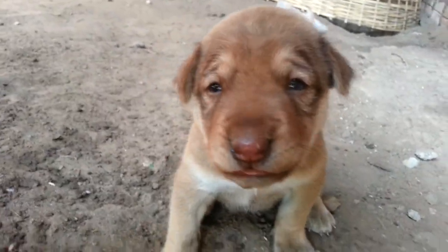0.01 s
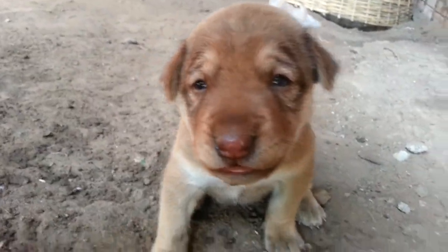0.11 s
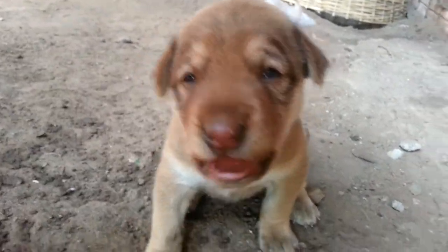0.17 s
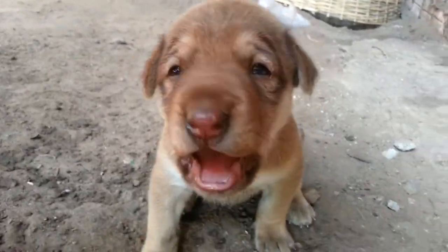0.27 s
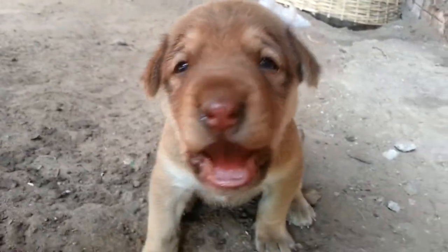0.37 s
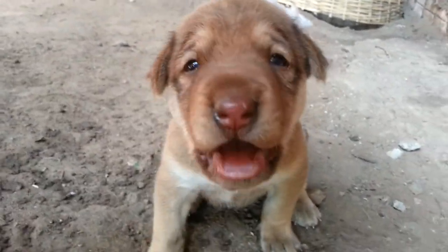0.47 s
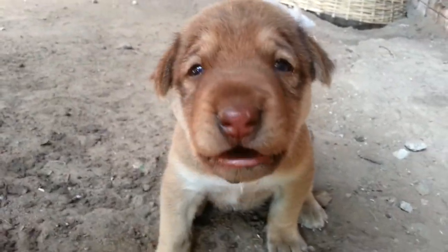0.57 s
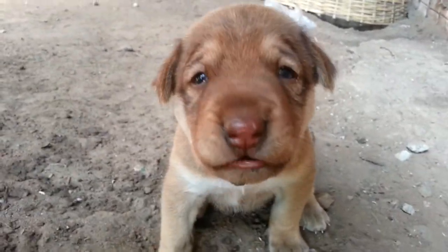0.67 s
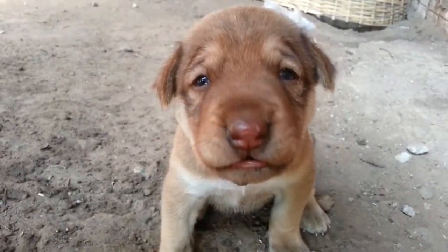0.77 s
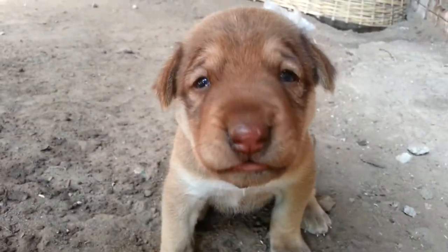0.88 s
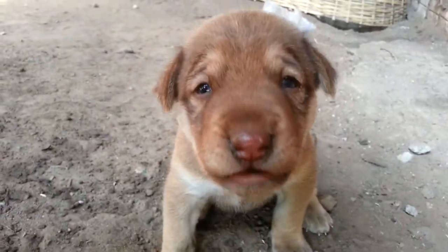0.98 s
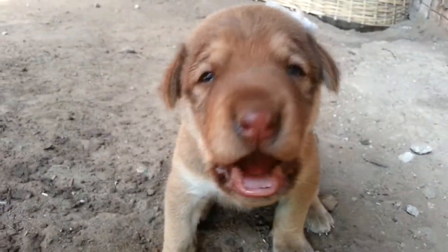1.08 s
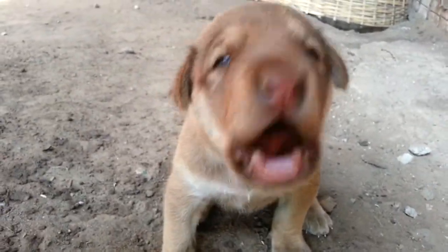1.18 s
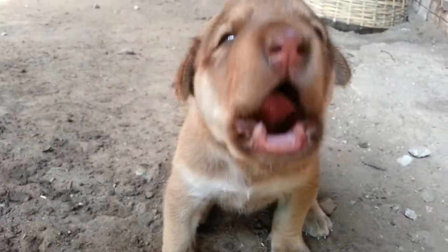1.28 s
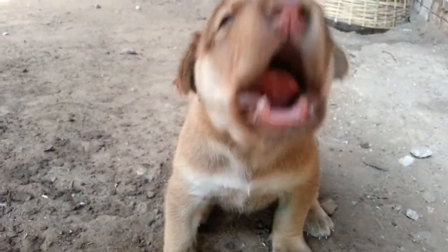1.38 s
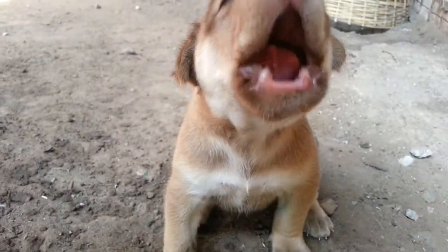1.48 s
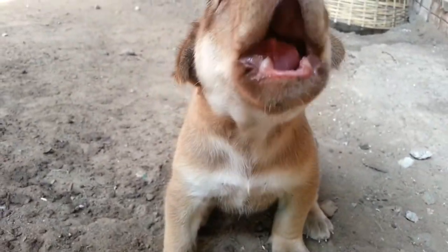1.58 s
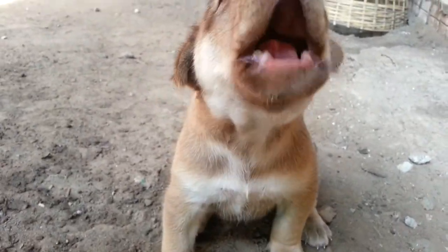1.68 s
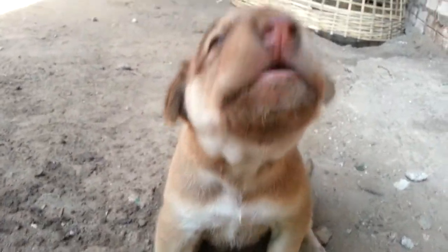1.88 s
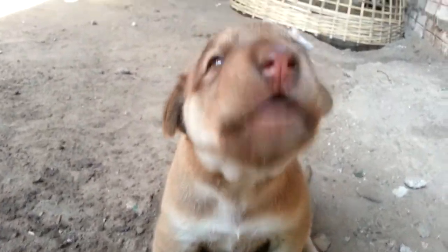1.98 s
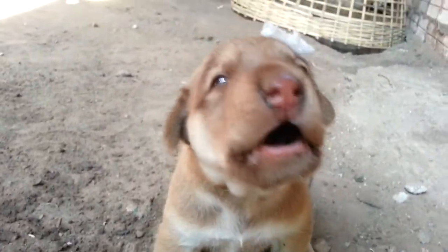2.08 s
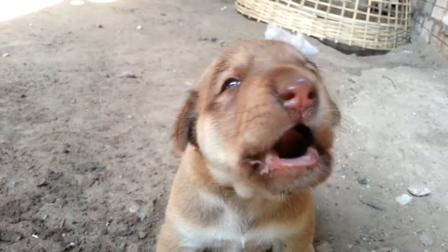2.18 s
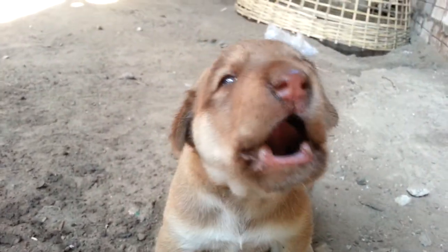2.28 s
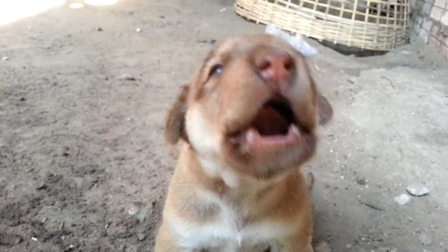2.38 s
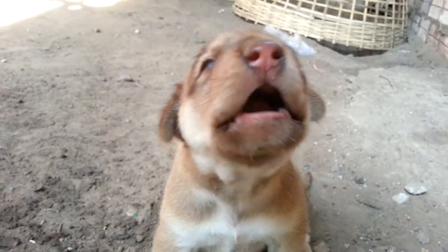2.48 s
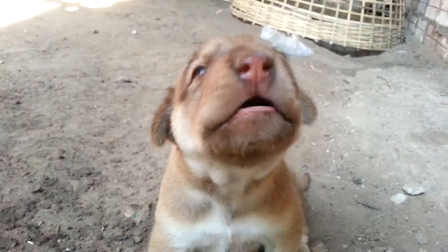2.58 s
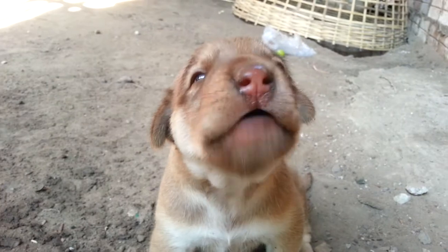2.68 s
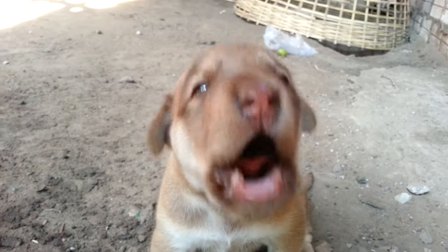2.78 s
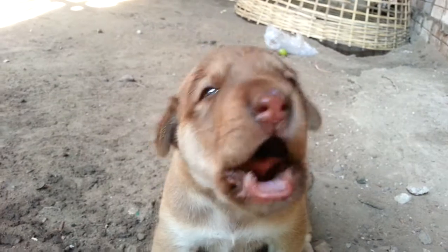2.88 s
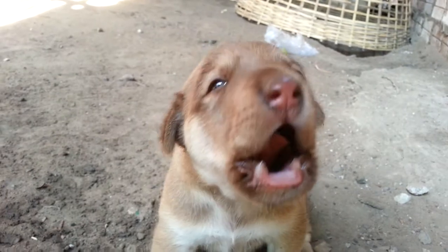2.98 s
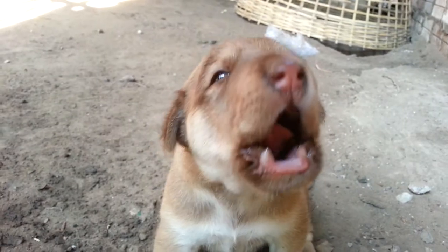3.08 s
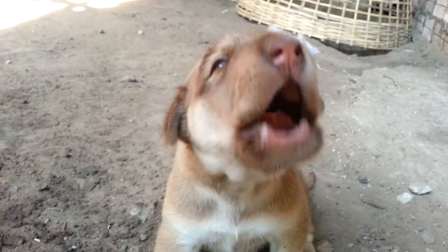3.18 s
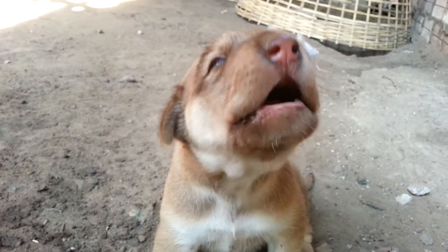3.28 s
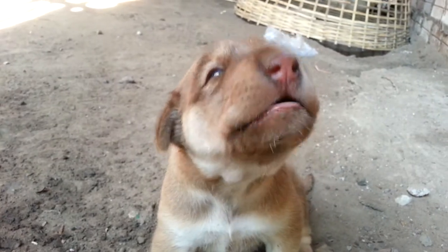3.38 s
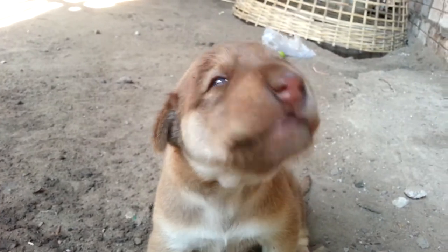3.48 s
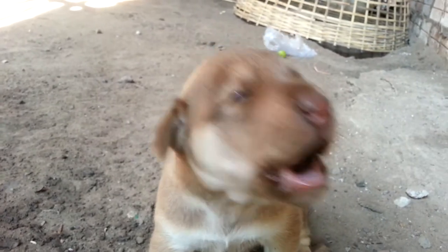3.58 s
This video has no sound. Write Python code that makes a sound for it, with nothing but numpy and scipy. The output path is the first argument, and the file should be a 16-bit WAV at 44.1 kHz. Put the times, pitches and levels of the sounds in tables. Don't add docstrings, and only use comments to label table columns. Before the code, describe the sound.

A puppy close to a handheld stereo microphone finishes one cry, then gives a sharp yelp turning creaky, a high whistling whine, a lower moan and an arching cry, in a walled dirt yard.

```python
import sys
import numpy as np
from scipy import signal
from scipy.fft import rfft, irfft
from scipy.io import wavfile
from scipy.ndimage import uniform_filter1d

SR = 44100
rng = np.random.default_rng(int(sys.argv[2]) if len(sys.argv) > 2 else 0)


def bounce(signal):
    frames = np.transpose(np.atleast_2d(signal))
    limited = np.clip(frames, -1, 1)
    pcm = np.round(limited * 32767).astype(np.int16)
    wavfile.write(sys.argv[1], SR, pcm)


def voltage_ratio(level):
    return 10 ** (np.asarray(level, float) / 20)


N = 158760
OVERDRIVE_FROM_DB = -7


def evened(x):
    return x / np.sqrt(np.mean(x ** 2) + 1e-20)


def read(points, hz):
    f, value = np.transpose(points)
    return np.interp(np.log(hz + 1), np.log(f + 1), value)


def resonate(x, hz, width):
    turn = np.exp(2j * np.pi * np.cumsum(hz * np.ones(len(x))) / SR)
    r = np.exp(-np.pi * width / SR)
    return 2 * (turn * signal.lfilter([1 - r], [1, -r], x / turn + 1e-18)).real


def vocal_folds(t, hz, db, rough, noise, wander):
    creak = np.clip((rough - 0.72) / 0.017, 0, 1) * (db < OVERDRIVE_FROM_DB)
    jitter = 0.27 * (rough - 0.36 * creak) ** 2 * evened(uniform_filter1d(noise[0], size=60))
    turns = np.cumsum(hz * (1 + jitter)) / SR
    k = np.arange(1, 34)[:, None]
    drift_hz = rng.uniform(4.013, 14, (3, len(k), 1))
    drift = np.sin(2 * np.pi * (drift_hz * t + rng.random((3, len(k), 1)))).sum(0)
    patchy = voltage_ratio(0.91 * np.sqrt(k - 1) * drift)
    folds = ((k * hz < 16000) * patchy * np.cos(2 * np.pi * k * turns)).sum(0)

    uneven = np.cos(np.pi * turns) + rough * evened(uniform_filter1d(noise[1], size=90))
    puffs = (0.83 + np.exp(-(turns % 1) / 0.45)) * noise[2]
    breathiness = voltage_ratio(-33.5) + 6.9 * rough ** 2 * (1 - rough)
    drive = folds * (1 + 0.5 * rough * uneven) + breathiness * puffs

    third = np.cos(2 * np.pi * turns / 3) - 1
    knocks = creak * (folds + 1.3 * puffs) * np.exp(2.2 * third) * voltage_ratio(1.8 * wander[2])
    return drive * (1 - creak), knocks, puffs


def vocal_tract(drive, knocks, puffs, age, mouth, throat_scale, nasal_db, colour_db, shut):
    # (frequency [Hz], width [Hz], left port level [dB], right port level [dB])
    formants = [(930, 790, -13, -13.5), (1599, 351, 2.5, 10.5), (2106, 526, -9.5, -1.5),
                (3135, 540, -14.5, -9.5), (4299, 480, -15, -16), (7420, 2180, -23.5, -28),
                (12000, 1670, -36, -45)]
    # (frequency [Hz], width [Hz], level [dB])
    slack_formants = [(985, 390, -1.5), (1660, 310, -0.5), (2370, 344, -3), (4300, 990, -20.5)]
    scale = throat_scale * (1 - shut * np.exp(-age / 0.025))
    opened = 45 * (mouth - 1)
    muffled = -12 * np.exp(-(age / 0.052) ** 2)
    lift = [0, 0, 0.6 * opened + muffled, opened, opened, opened, nasal_db]
    tongue = [0, *colour_db, 0]
    bands = []
    for i, (f, w, _, _) in enumerate(formants):
        centre = f * scale ** (i < 5)
        source = drive + (i == 6) * voltage_ratio(0.5) * puffs
        ringing = resonate(resonate(source, centre, w), centre, 1.165 * w)
        bands.append((-1) ** i * voltage_ratio(lift[i] + tongue[i]) * ringing)
    voice = -voltage_ratio(np.array(formants)[:, 2:].T) @ bands

    slack = 0
    for i, (f, w, db) in enumerate(slack_formants):
        slack = slack + (-1) ** i * voltage_ratio(db) * resonate(resonate(knocks, f, w), f, w)
    voice = voice + voltage_ratio([[5.5], [7]]) * slack
    voice = signal.sosfilt(signal.butter(4, 300, 'high', fs=SR, output='sos'), voice)
    return signal.lfilter(*signal.iirnotch(8750, 2.5, SR), voice)


def breath(rows, rate, share, crest, catch_db, throat_scale, nasal_db, colour_db, shut):
    s, hz, db, rough, mouth = np.transpose(rows)
    start = round(s[0] * SR)
    t = np.arange(start, min(N, round((s[-1] + 0.24) * SR))) / SR
    age = t - s[0]
    hz, db, rough, mouth = (np.interp(t, s, v) for v in (hz, db, np.clip(rough, 0, 1), mouth))
    noise = rng.standard_normal((N // 4, 4))[:len(t)].T
    wander = [evened(uniform_filter1d(uniform_filter1d(v, size=500), size=500)) for v in noise]

    beat = 2 * np.pi * rate * (t - crest)
    settled = np.clip(age / 0.094, 0, 1) ** 2
    shake = share * settled * (np.cos(beat) + 0.09 * np.sin(2 * beat))
    hz = uniform_filter1d(hz, size=250) * (1 + shake + 0.005 * wander[0])
    drive, knocks, puffs = vocal_folds(t, hz, db, rough, noise, wander)
    voice = vocal_tract(drive, knocks, puffs, age, mouth, throat_scale, nasal_db, colour_db, shut)
    voice = voice / np.sqrt(uniform_filter1d(voice.mean(0) ** 2, size=1800) + 1e-9)

    catch = catch_db * np.exp(-((t - s[-1] + 0.016) / 0.0078) ** 2)
    forced = np.maximum(db - OVERDRIVE_FROM_DB, 0)
    release = -26.0 * np.maximum(t - s[-1], 0) / 0.0072
    push = voltage_ratio(db + 0.3 * forced + release + catch + 0.74 * wander[1])
    push = push * np.minimum(age / 0.00082 + (s[0] == 0), 1)
    thump = evened(resonate(noise[3], 21, 50))
    blast = voltage_ratio([[-39.5], [-34.5]]) * rough * forced * thump
    return start, push * (voice + blast)


def puppy():
    # (time [s], pitch [Hz], effort [dB], roughness [0-1], mouth opening [ratio])
    tail_end = [(0, 474.4, -4.5, 0.12, 0.83), (.016, 434, -14, 0.31, 0.96), (.03, 420, -33.5, 0.2, 1)]
    yelp_rise = [(0.227, 443.3, -9.5, 0.19, 0.78), (0.243, 601, -2.5, 0.4, 1.17),
                 (0.27, 791.2, 4, 0.27, 1.13), (0.278, 1098, -3, 0.6, 1.576),
                 (.297, 1188, -1.5, 0.45, 1.36), (0.311, 1252, -2.5, 0.34, 1.35),
                 (0.321, 1204, -7.5, 0.14, 1.44), (0.331, 1076, -7.5, 0.05, 1.34)]
    sob = [(0.355, 1092, -8.5, .04, 1.11), (.371, 874.5, -12, 0.02, 1.105), (0.393, 986, -11.5, .02, 1.12),
           (0.409, 815.5, -13.5, .02, 1.14), (0.44, 896, -11.5, 0.032, 0.99), (.459, 789.4, -12, .03, 1.12),
           (0.481, 833, -14.5, 0.05, 1.08)]
    creaking = [(0.485, 849, -12, 0.72, 1.15), (0.513, 777, -8, 0.73, 1.01), (0.515, 743, -17, .3, 0.78),
                (0.526, 769, -23, 0.22, 1.05), (0.529, 812.6, -15.5, 0.72, 0.96),
                (0.581, 572, -22, 0.85, 0.9), (0.591, 800, -10.5, .8, 1.1), (0.596, 620, -12.5, 0.11, 0.63),
                (0.609, 686, -20.5, 0.14, 0.87)]
    waver = [(1.081, 438.7, -8.5, 0.081, 1.06), (1.093, 564.2, -4, 0.08, 1.15),
             (1.11, 774.3, 1, 0.15, 1.18), (1.115, 1026, -5, 0.7, 1.44), (1.131, 1068, 1.5, 0.69, 1.27),
             (1.136, 1249, 0, 0.4, 1.18), (1.182, 1235, -7, 0.072, 1.21), (1.19, 1054, -7, 0.029, 1.18)]
    waver_steps = [(1.217, 1071, -11, .04, 1.25), (1.231, 824, -7, 0.071, 0.92),
                   (1.241, 835, -10.5, 0.047, 0.92), (1.255, 944, -10.5, .04, 0.74),
                   (1.267, 793, -10, 0.026, 0.91), (1.277, 823, -8, .03, 0.76),
                   (1.285, 978, -10.5, 0.051, 1.03), (1.309, 1002, -6.5, .04, 1.06),
                   (1.316, 1093, -15, 0.045, 0.93)]
    whistle = [(1.315, 1203, -14.5, 0.19, 1), (1.329, 1309, -6.5, 0.068, 1), (1.364, 1310, -5, .03, 0.88),
               (1.413, 1241, -11, .006, 0.97), (1.453, 1248, -9.5, 0.0058, 1),
               (1.528, 1139, -8.5, 0.004, 0.93), (1.745, 1163, -10.5, 0.021, 0.91)]
    whistle_end = [(1.791, 1132, -17, 0.03, 0.96), (1.809, 1130, -12.5, 0.13, 0.89),
                   (1.816, 1045, -12, 0.19, 0.83), (1.826, 993, -14.5, 0.19, 0.55)]
    howl = [(2.061, 372, -28.5, 0.27, 1), (2.089, 548, -5.5, 0.14, 1.02), (2.115, 599.7, -4, 0.04, 1.17),
            (2.148, 603, -10, 0.015, 1.114), (2.211, 474.4, -10, 0.009, 1.016),
            (2.248, 470, -10.5, 0.0063, 1.065), (2.272, 495.6, -8, .007, 0.91),
            (2.4, 541.2, -9, 0.0096, 0.88)]
    howl_end = [(2.429, 525.6, -8.5, .008, 0.85), (2.52, 521.4, -7, .01, 0.71),
                (2.551, 538, -10, 0.016, 0.85), (2.57, 496, -11, 0.3, 0.71)]
    cry_rise = [(2.777, 348.7, -15, 0.21, 0.9), (2.796, 580.3, -5, 0.096, 1.144),
                (2.817, 950, 0.5, 0.65, 1.2), (2.844, 1130, 0.5, 0.61, 1.22),
                (2.876, 992, -4.5, 0.043, 1.15), (2.899, 938, -5.5, 0.011, 1.1),
                (2.918, 745, -10.5, 0.024, 0.91)]
    cry_sag = [(2.951, 714.6, -10.5, .01, 0.95), (2.97, 642, -10, .02, 0.87),
               (2.996, 634.5, -15, .02, 0.81), (3.012, 585, -10.5, .03, 0.78), (3.058, 616, -8.5, .02, 0.8),
               (3.077, 666, -11, 0.015, 0.84), (3.115, 709, -6.5, 0.018, 0.51)]
    cry_arch = [(3.132, 767, -5, 0.008, 0.65), (3.196, 828.7, -6.5, 0.013, 0.79),
                (3.254, 794, -10.5, 0.017, 0.25), (3.289, 730.6, -6.5, 0.014, 0.74),
                (3.311, 707, -13, 0.087, 0.71), (3.334, 618, -13.5, 0.27, 0.68)]
    next_cry = [(3.585, 360.4, -39, 0.58, 0.99), (3.6, 480, -9.5, 0.42, 1.15)]
    # (tremble rate [1/s], tremble depth [share], time of a crest [s], closing catch [dB],
    # throat scale [ratio], nasal hiss [dB])
    trembles = [
        (23, 0.0073, 10.5, -5.5, 0.97, -1.5),
        (22.78, 0.0039, 2.5, -3.5, 1.023, -12),
        (24, 0.0012, -2.8, 0, 1.061, -2.5),
        (23.98, 0.0005, 4.5, -10.5, 0.999, 7),
        (22.8, 0.015, 1.5, -3, 0.927, -7.5),
        (23.22, 0.0017, 3.5, -1.5, 0.964, -9),
        (23.1, 0.0036, -22, 3.5, 0.82, 8),
    ]
    # (2nd resonance [dB], 3rd [dB], 4th [dB], 5th [dB], 6th [dB])
    colours = [(0, 0, 0, 0.0068, -7.5), (0, -2, 0.011, 0.011, -3.5), (0, 1, 0, 0.006, 0.5),
               (0, 2, 0.016, 0, 0), (0, -1, 0, 0, -1), (0, 4.5, 0.0053, 0.012, 2.5), (0, -13.5, 0, 0, -4)]
    jaws = [0.011, 0.095, 0.13, 0.061, 0.42, 0.53, 0.12]
    # (delay [s], level [dB])
    bounces = [
        (.0011, -14),
        (.0016, -14.5),
    ]
    # (frequency [Hz], left lead [rad])
    port_phase = [(0, -4), (1640, 0.5), (4480, 1.5), (7410, -1.46), (11500, 1.7), (15100, -4.7)]
    cries = [tail_end, yelp_rise + sob + creaking, waver + waver_steps, whistle + whistle_end,
             howl + howl_end, cry_rise + cry_sag + cry_arch, next_cry]
    out = np.zeros((2, N))
    for rows, tremble, colour, shut in zip(cries, trembles, colours, jaws):
        at, sound = breath(rows, *tremble, colour, shut)
        out[:, at:at + sound.shape[1]] += sound
    n = np.arange(N)
    bounced = [np.interp(n - delay * SR, n, x, left=0) * voltage_ratio(db) for x, (delay, db) in zip(out, bounces)]
    lead = np.outer([.5, -.5], read(port_phase, np.fft.rfftfreq(N, 1 / SR)))
    return irfft(rfft(out + bounced) * np.exp(1j * lead), N)


def yard(x):
    # (frequency [Hz], reverberation time [s])
    decay = [(300, 0.23), (1500, 0.31), (8000, 0.73)]
    taps = np.zeros((2, SR))
    slots = np.arange(500, SR - 20, 20)
    at = slots + rng.integers(0, 20, (2, len(slots)))
    np.put_along_axis(taps, at, rng.choice([-1., 1.], at.shape), 1)
    sway = evened(signal.lfilter(*signal.butter(2, 85, fs=SR), rng.standard_normal((N, 2)).T))
    hz, t, z = signal.stft(taps, SR, nperseg=256)
    t60 = np.maximum(read(decay, hz), .05)[:, None]
    tail = signal.istft(z * voltage_ratio(-60 * t / t60), SR, nperseg=256)[1]
    return voltage_ratio(-13) * signal.fftconvolve(x * sway, tail / np.linalg.norm(tail[0]), axes=1)[:, :N]


def outdoor_wash():
    # (frequency [Hz], density [dB per Hz])
    wash_spectrum = [(30, -36.5), (70, -14), (200, -3.5), (800, -12.5), (2050, -6.5), (2900, -15.5),
                     (13800, -31.5), (15400, -51.5)]
    # (frequency [Hz], coherence [-1 to 1])
    likeness = [(60, 1), (950, 0.13), (14900, 0.02)]
    frames, hz = N // 256 + 5, np.fft.rfftfreq(1024, 1 / SR)
    a, b, c, d, patches = rng.standard_normal((frames, 513, 5)).T
    patches = evened(uniform_filter1d(uniform_filter1d(patches, size=10, axis=0), size=12, axis=1))
    same = np.clip(read(likeness, hz), -1, 1)[:, None]
    left = a + 1j * b
    right = same * left + np.sqrt(1 - same ** 2) * (c + 1j * d)
    z = np.array([left, right]) * voltage_ratio(read(wash_spectrum, hz)[:, None] + 2.25 * patches)
    wash = signal.istft(z, nperseg=1024, noverlap=768)[1][:, :N]
    wash = signal.sosfilt(signal.butter(3, 95, 'high', fs=SR, output='sos'), wash)
    return voltage_ratio(-44.5) * evened(wash)


def far_machine():
    # (frequency [Hz], width [Hz], level [dB])
    tones = [(1484, 10, -36), (1940, 11, -7.5), (1910, 13, -7), (2030, 11, -8.5), (3327, 68, -14)]
    white = rng.standard_normal(N)
    hum = sum(voltage_ratio(db) * evened(resonate(resonate(white, f, w), f, w)) for f, w, db in tones)
    return voltage_ratio(-50) * evened(hum)


def scene():
    dog = puppy()
    power = abs(uniform_filter1d((dog ** 2).mean(0), size=600))
    over_db = np.maximum(10 * np.log10(power + 1e-12) + 18, 0)
    ducked = voltage_ratio(-over_db)
    return dog + yard(dog) * ducked + (outdoor_wash() + far_machine()) * ducked


def band_limit(x):
    return signal.sosfilt(signal.butter(12, 15500, fs=SR, output="sos"), x)


def record(dry):
    ceiling = 1.07 * (1 - .05 * np.sign(dry))
    knee = 12.
    mix = dry / (1 + abs(dry / ceiling) ** knee) ** (1 / knee)
    return band_limit(mix)


dry = scene()
out = record(dry)
bounce(out)
```